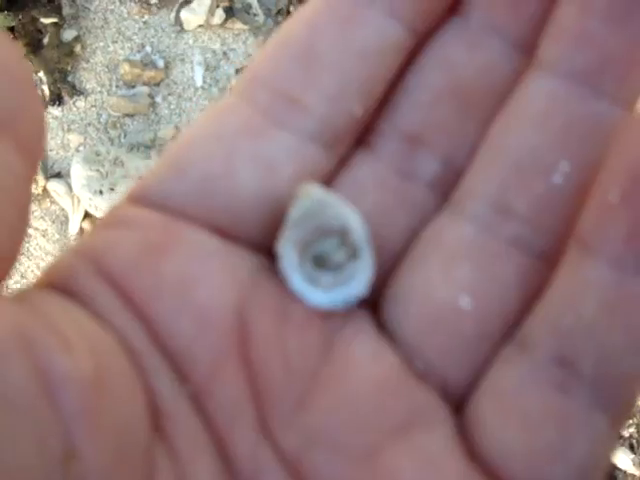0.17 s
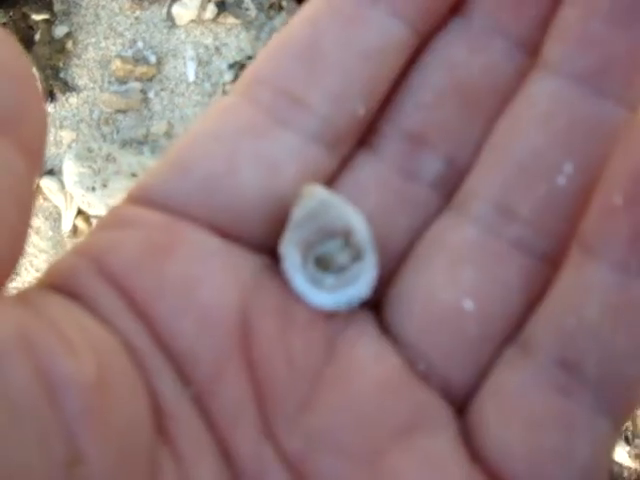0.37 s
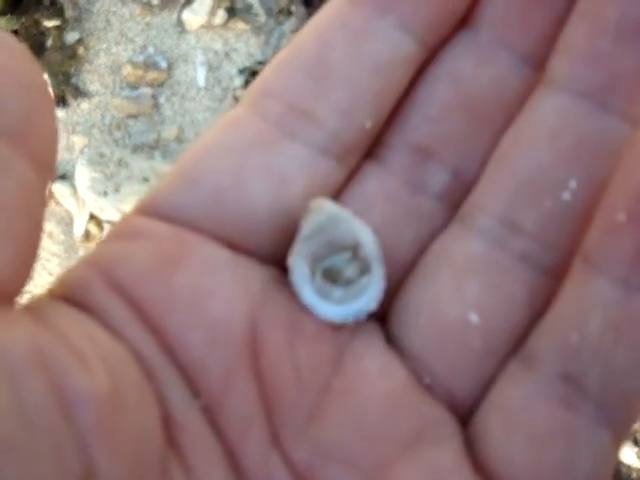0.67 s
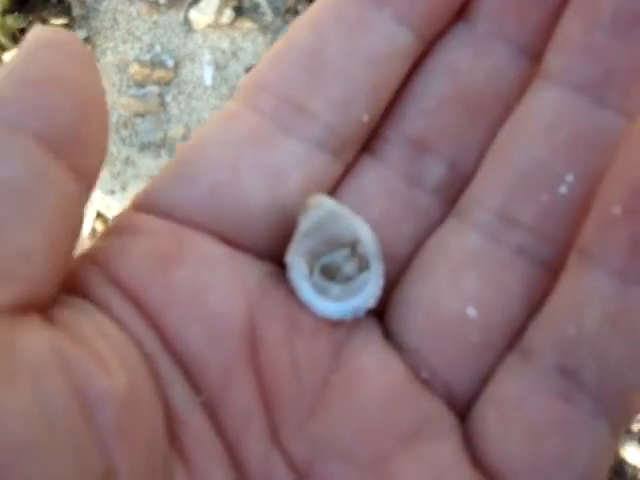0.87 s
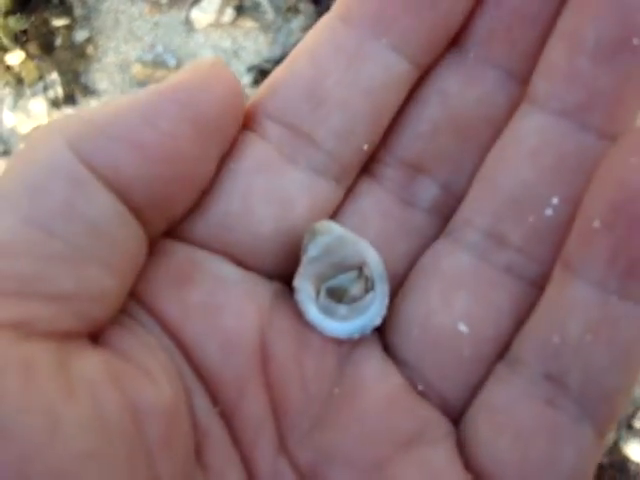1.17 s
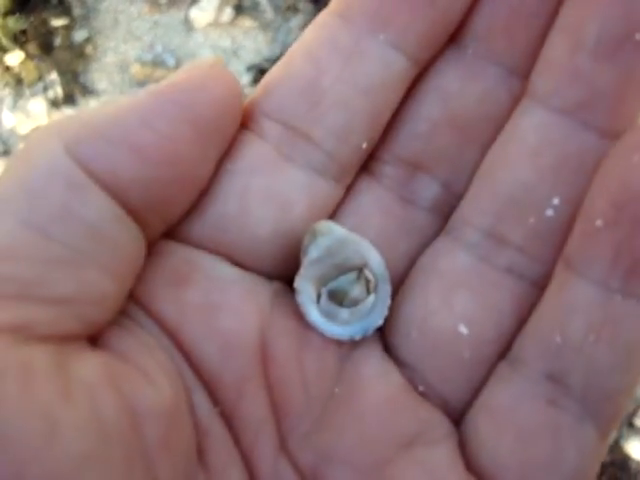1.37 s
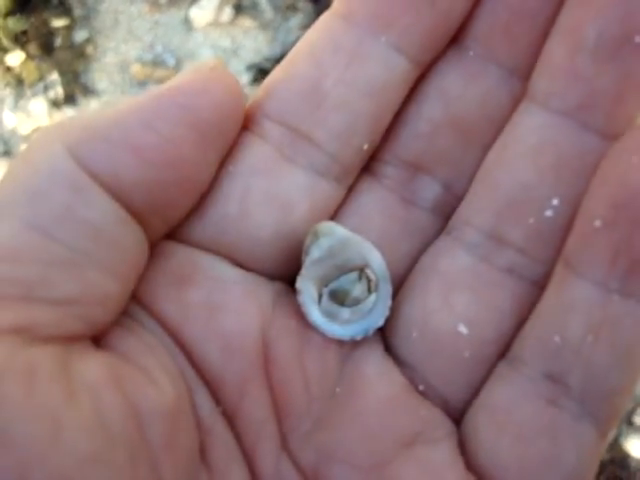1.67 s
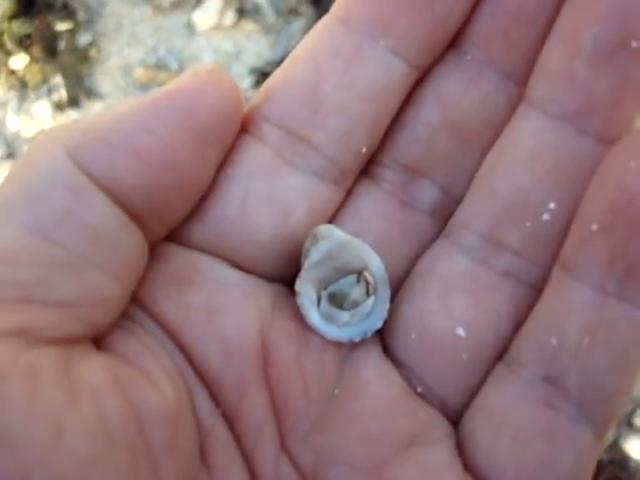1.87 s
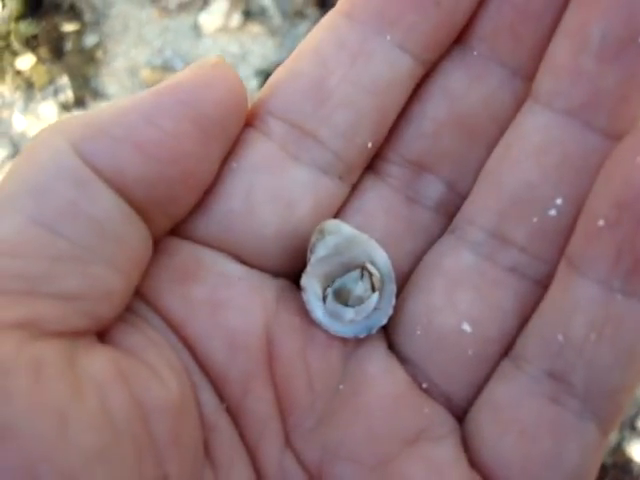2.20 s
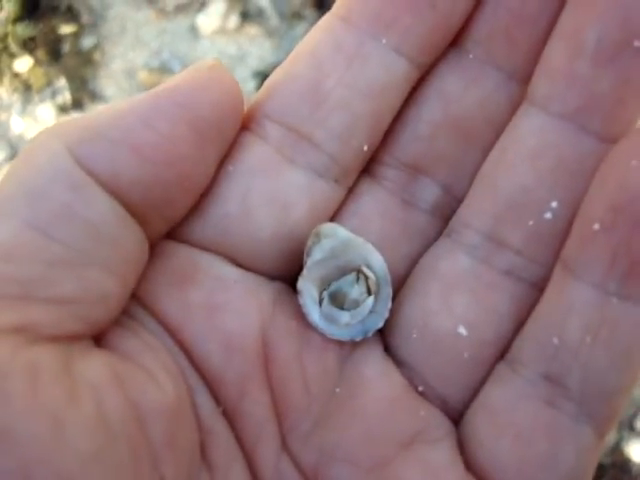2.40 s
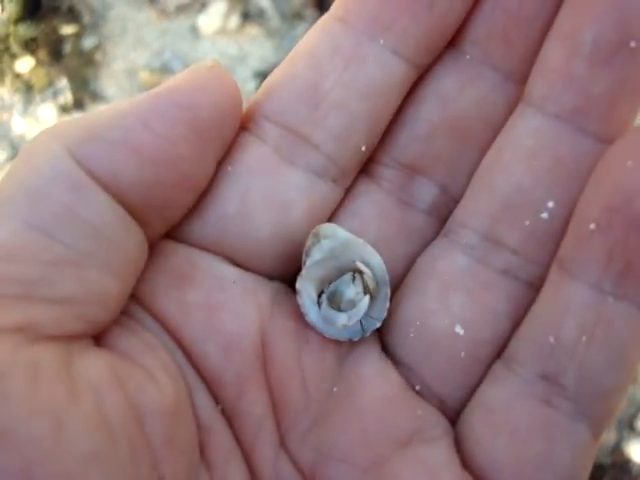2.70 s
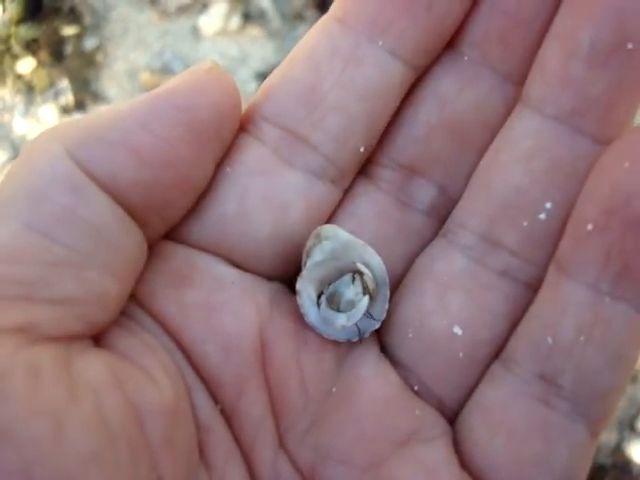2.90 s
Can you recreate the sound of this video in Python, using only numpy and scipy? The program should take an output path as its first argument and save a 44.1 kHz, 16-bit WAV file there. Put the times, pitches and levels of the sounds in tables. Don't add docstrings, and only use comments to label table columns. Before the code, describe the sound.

Surf rushes up, roars softly around one second, and fades into fizzing foam over faint sea wash.

```python
import sys
import numpy as np
from scipy import signal
from scipy.fft import rfft, irfft, next_fast_len
from scipy.io import wavfile
from scipy.ndimage import uniform_filter1d, map_coordinates

SR = 44100
rng = np.random.default_rng(int(sys.argv[2]) if len(sys.argv) > 2 else 0)


def store_pcm(level_fs):
    pcm = np.round(np.clip(level_fs, -1, 1) * 32767).astype(np.int16)
    wavfile.write(sys.argv[1], SR, np.atleast_2d(pcm).T)


def rack_gain(trim_db):
    fader = np.asarray(trim_db, float)
    return 10 ** (fader / 20)


N = 134505
TIME_S = np.arange(N) / SR

# f/Hz, density/dB per Hz
FAR_SEA_SPECTRUM = [(30, -19), (70, 1), (150, -9), (300, -1), (600, -12), (1500, -21.5), (5000, -21)]
# t/s, signed step/full scale
MOTOR_STEPS = [(0.078, 0.0085), (.262, -0.00031), (1.101, .002), (1.115, 0.014), (1.463, -0.014),
               (1.718, -0.0031), (2.008, 0.016), (2.152, -0.015), (2.418, -0.0031), (2.597, -0.00002),
               (2.609, 0.014), (2.752, -0.012), (3.016, -.003)]
FIRST_TICKS_S = [
    0.0115,
    1.4782,
    2.1813,
    2.7795,
]
# t/s, level/dB
WAVE_STRENGTH = [(.09, -49.5), (.3, -46.5), (.46, -45), (.6, -41.5), (.8, -41), (1.0, -38.5), (1.3, -40.5),
                 (1.62, -43), (2.04, -46), (2.4, -51), (2.7, -54), (3.05, -55)]
# f/Hz, density/dB per Hz
FOAM_SPECTRUM = [(60, -21.5), (150, -6), (900, -8.5), (2200, -15), (3800, -18), (5000, -22), (7500, -26.5),
                 (10300, -35.5)]
# f/Hz, density/dB per Hz
BOOM_SPECTRUM = [(50, -29), (100, -7.5), (150, -5), (215, 0.5), (300, -6.5), (500, -29)]
# f/Hz, density/dB per Hz
PLUNGE_SPECTRUM = [(100, -42), (200, -14), (290, 4.5), (450, 1), (750, -7), (1300, -32.5)]
# f/Hz, density/dB per Hz
CREST_SPECTRUM = [(250, -30), (550, -13), (950, 3.5), (1400, -2.5), (2500, -12.5), (5000, -45)]
# t/s, low f/Hz, high f/Hz, level/dB
CHANNEL_SPLITS = [
    (.091, 7600, 8950, -66),
    (.534, 4250, 5180, -57),
    (.788, 4250, 5550, -53),
    (1.788, 7050, 8900, -58),
    (3.04, 6950, 8250, -70),
]


def unit(x):
    return x / np.sqrt(np.mean(x ** 2) + 1e-20)


def filtered(x, response):
    size = next_fast_len(N + SR // 2)
    spectrum = rfft(x, size) * response(np.fft.rfftfreq(size, 1 / SR))
    return irfft(spectrum, size)[..., :N]


def wobble(rate_hz):
    return map_coordinates(rng.standard_normal(400), [TIME_S * rate_hz + 1], mode="mirror")


def swell(peak_s, hold_s, rise_db_s, fall_db_s):
    before_s = np.clip(peak_s - TIME_S, 0, None)
    after_s = np.clip(TIME_S - peak_s - hold_s, 0, None)
    return uniform_filter1d(-rise_db_s * before_s - fall_db_s * after_s, size=2500)


def rush(spectrum, patchy_db):
    z = signal.stft(rng.standard_normal(N), nperseg=512)[2]
    field = uniform_filter1d(rng.standard_normal(z.shape), size=6, axis=0)
    field = uniform_filter1d(field, size=12, axis=1)
    noise = signal.istft(z * rack_gain(patchy_db * unit(field)), nperseg=512)[1][:N]
    f_hz, level_db = np.transpose(spectrum)

    def colour(hz):
        return rack_gain(np.interp(np.log(hz + 1), np.log(f_hz), level_db, left=-60))

    return unit(filtered(noise, colour))


def far_sea():
    return rack_gain(-51.5) * rush(FAR_SEA_SPECTRUM, patchy_db=-1.9)


def focus_motor():
    step_s, tick_s, tick_edge_s, coupling_s = 0.0011, 0.0023, 0.00067, 0.029
    frame_s = 1 / 30
    current = np.zeros(N)
    for at_s, size in MOTOR_STEPS:
        current += size * (1 + np.tanh((TIME_S - at_s) / step_s)) / 2
    for first_s in FIRST_TICKS_S:
        for k in range(8):
            from_centre_s = abs(TIME_S - first_s - k * frame_s)
            pulse = (1 + np.tanh((tick_s / 2 - from_centre_s) / tick_edge_s)) / 2
            current += rack_gain(-40.5 + rng.normal(0, 0.68)) * pulse
    keep = np.exp(-1 / (coupling_s * SR))
    return signal.lfilter([1, -1], [1, -keep], current)


def foam(surge_db):
    at_s, level_db = np.transpose(WAVE_STRENGTH)
    mean_db = level_db.mean()
    wave_db = np.interp(TIME_S, at_s, level_db)
    foam_db = mean_db + 5 + 0.96 * (wave_db - mean_db)
    return rack_gain(foam_db + surge_db) * rush(FOAM_SPECTRUM, patchy_db=0.25)


def boom():
    level_db = -41.5 + swell(peak_s=1.0, hold_s=0.43, rise_db_s=21, fall_db_s=20.5)
    return rack_gain(level_db + 0.6 * wobble(rate_hz=10)) * rush(BOOM_SPECTRUM, patchy_db=1.1)


def plunge():
    level_db = -34 + swell(peak_s=0.8, hold_s=0.4, rise_db_s=56, fall_db_s=23.5)
    return rack_gain(level_db + 0.25 * wobble(rate_hz=19)) * rush(PLUNGE_SPECTRUM, patchy_db=0.7)


def bubbles(count):
    centre_hz, spread, ring_cycles, size_db = 1026, 0.319, 4.16, 3
    sink_at_s, sink_span_s, sink_oct = 0.717, 0.043, 0.36
    ring_n = 900
    start, strength = rng.random((2, count, 1))
    sink = sink_oct * (1 + np.tanh((start * N / SR - sink_at_s) / sink_span_s)) / 2
    hz = centre_hz * 2 ** -sink * np.exp(spread * rng.standard_normal((count, 1)))
    hz = np.clip(hz, 150, 6000)
    t = np.arange(ring_n) / SR
    age = t * hz / ring_cycles
    ring = np.sin(2 * np.pi * hz * t * (1 + 0.11 * age))
    ring *= np.exp(-3 * age) * (1 - np.exp(-12 * age))
    ring *= rack_gain(-size_db * np.log(1 - strength))
    at = (start * N).astype(int) + np.arange(ring_n)
    return unit(np.bincount(at.ravel(), ring.ravel(), N + ring_n)[:N])


def crest(surge_db):
    level_db = -38.5 + swell(peak_s=0.65, hold_s=0.3, rise_db_s=25, fall_db_s=12.5)
    cloud_db = level_db + surge_db + 0.4 * wobble(rate_hz=12)
    cloud = rack_gain(cloud_db) * rush(CREST_SPECTRUM, patchy_db=0.9)
    return cloud + rack_gain(level_db - 3) * bubbles(count=5000)


def breaking_wave():
    surge_db = 0.5 * wobble(rate_hz=9.26) + 0.13 * wobble(rate_hz=25)
    return foam(surge_db) + boom() + plunge() + crest(surge_db)


def dropouts(x):
    from_hz, share, hole_db = 4500, 0.007, -30
    hz, _, z = signal.stft(x, SR, nperseg=256)
    chance = share * np.clip(hz / from_hz - 1, 0, 1)[:, None] ** 0.5
    seeds = (rng.random(z.shape) < chance) * 1.0
    spread = uniform_filter1d(uniform_filter1d(seeds, size=4, axis=0), size=3, axis=1)
    gain = np.where(spread > 1e-6, rack_gain(hole_db), 1)
    return signal.istft(z * gain, SR, nperseg=256)[1][:N]


def scene():
    sea = far_sea() + breaking_wave()
    return np.tile(dropouts(sea) + focus_motor(), (2, 1))


def roll_off(x):
    return signal.sosfilt(signal.butter(12, 10050, fs=SR, output="sos"), x)


def record(dry):
    start_s, split_s, top_hz = 0.0792, 0.044, 10120
    side = np.zeros(N)
    for at_s, low_hz, high_hz, db in CHANNEL_SPLITS:
        band = filtered(rng.standard_normal(N), lambda hz: (hz > low_hz) & (hz < high_hz))
        window = np.cos(np.pi * np.clip((TIME_S - at_s) / split_s, -0.5, 0.5))
        side += rack_gain(db) * unit(band) * window
    since_s = TIME_S - start_s
    gate = np.clip(since_s / 0.00027, 0, 1)
    gate += 0.063 * np.exp(np.minimum(since_s, 0) / 0.002) * (since_s < 0)
    mix = filtered(dry + side * [[1], [-1]], lambda hz: hz < top_hz) * gate
    return roll_off(mix)


dry = scene()
out = record(dry)
store_pcm(out)
```